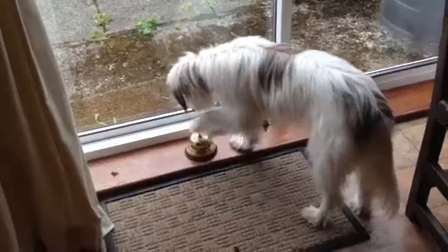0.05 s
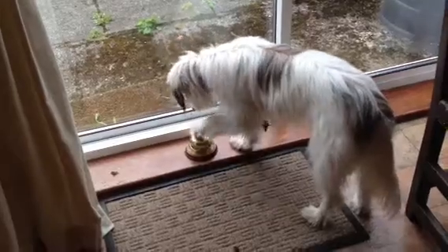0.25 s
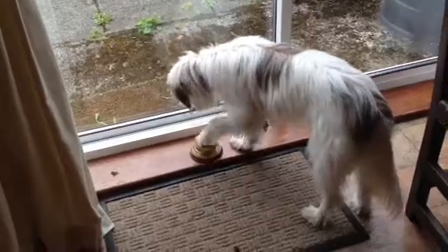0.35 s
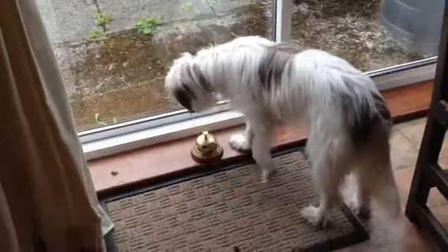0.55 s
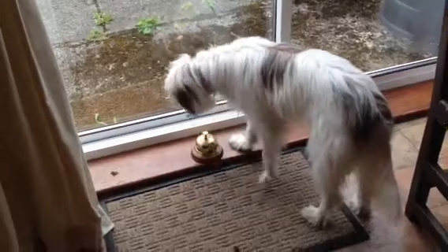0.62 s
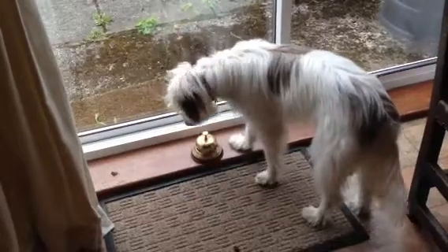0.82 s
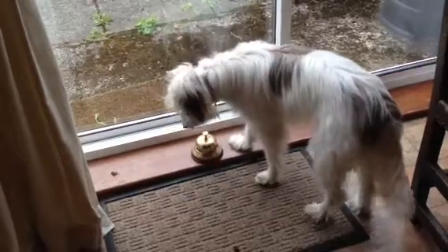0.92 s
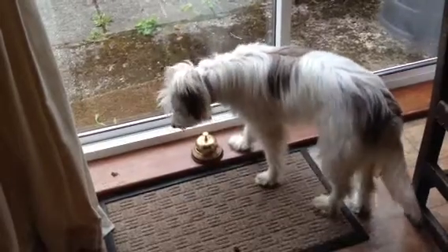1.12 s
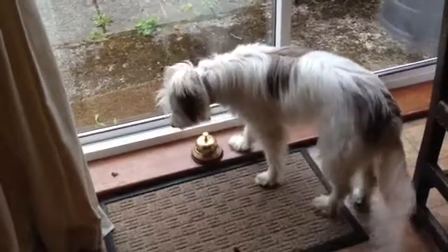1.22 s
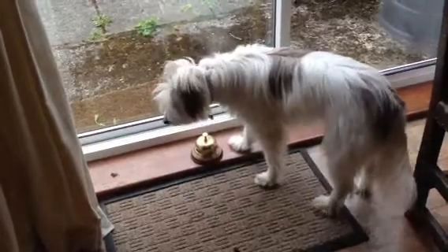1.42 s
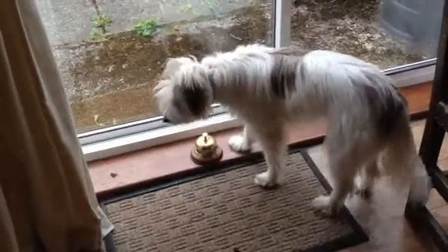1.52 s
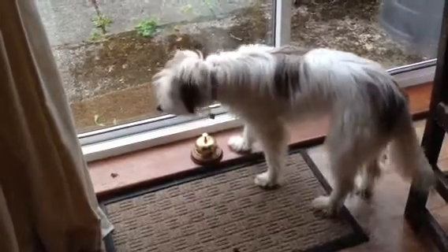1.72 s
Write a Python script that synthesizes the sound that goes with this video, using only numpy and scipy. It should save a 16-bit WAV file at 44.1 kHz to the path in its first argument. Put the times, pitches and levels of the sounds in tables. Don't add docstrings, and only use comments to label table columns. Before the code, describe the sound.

Bell ding, sharp and bright, recorded close indoors: a faint earlier ring and leg shuffle, tiny knocks, then the strike with a long wavering decay, light scuffs on a mat and small metallic ticks near the end.

```python
import sys
import numpy as np
from scipy import signal
from scipy.fft import rfft, irfft
from scipy.io import wavfile
from scipy.ndimage import uniform_filter1d

SR = 44100
rng = np.random.default_rng(int(sys.argv[2]) if len(sys.argv) > 2 else 0)


def ratio_of_db(decibels):
    return 10 ** (np.asarray(decibels, float) / 20)


def persist_wave(psi):
    counts = np.round(np.clip(psi, -1, 1) * 32767).astype(np.int16)
    wavfile.write(sys.argv[1], SR, np.atleast_2d(counts).T)


N = 77175
T = np.arange(N) / SR
STRIKE_S = .2325


def curve(rows, column=1):
    rows = np.array(rows)
    return np.interp(T, rows[:, 0], rows[:, column])


def noise(colour):
    points = np.array(colour)
    log_hz = np.log(np.fft.rfftfreq(N, 1 / SR) + 1)
    at = np.log(points[:, 0])
    outside = np.maximum(at[0] - log_hz, 0) + np.maximum(log_hz - at[-1], 0)
    db = np.interp(log_hz, at, points[:, 1]) - 40 * outside
    x = irfft(rfft(rng.standard_normal(N)) * ratio_of_db(db), N)
    return x / x.std()


def walk(rate):
    width = int(SR / rate)
    x = uniform_filter1d(uniform_filter1d(rng.standard_normal(N), width), width)
    return x / x.std()


def fade(start, t60):
    return (T >= start) * ratio_of_db(-60 * np.maximum(T - start, 0) / t60)


def ring(start, modes):
    return sum(ratio_of_db(db) * fade(start, t60) * np.sin(2 * np.pi * hz * (T - start)) for hz, db, t60 in modes)


def room(x):
    low = signal.sosfilt(signal.butter(1, 1500, fs=SR, output="sos"), rng.standard_normal(N))
    high = rng.standard_normal(N)
    tail = low * fade(.004, .68) + high * fade(.0079, .46) * .36
    return signal.fftconvolve(x, tail / np.sqrt(np.sum(tail ** 2)))[:N]


def hum():
    # f/Hz, level/dB
    tone_colour = [(40, -44.5), (90, -30.5), (200, -26), (900, -21), (2800, -27), (9500, -32.5),
                   (13500, -32.5), (15500, -35)]
    tone = noise(tone_colour) * ratio_of_db(2.4 * walk(7.5))
    bass = ratio_of_db(-10.5 + 2.5 * walk(5.2)) * noise([(150, 2), (330, 0), (600, -10.5)])
    return ratio_of_db(-69.5) * (tone + bass)


def earlier():
    # f/Hz, level/dB, T60/s
    late_modes = [(4942, -67, 0.18), (7395, -83, .3), (8050, -65, 0.33), (7729, -65.5, 0.61),
                  (7778, -55, .3), (11300, -68.5, .3), (13500, -66.5, 0.47), (14800, -67.5, .3)]
    # f/Hz, level/dB
    wash_colour = [(1760, -55), (3000, -35), (5640, -24.5), (7640, -4), (9650, -17), (10200, -9.5),
                   (11100, -25), (12900, -16), (15500, -21)]
    wash = ratio_of_db(-59) * fade(0, .4) * noise(wash_colour)
    return ring(0, late_modes) * ratio_of_db(2.5 * walk(30)) + wash


def leg():
    # t/s, thud level/dB, rub level above the thud/dB
    shuffle = [(0, -64, -29), (.06, -62, -18), (.1, -57, -21), (.19, -55.5, -15.5), (.245, -42.5, 4),
               (.34, -61.5, -1), (.49, -58, -6.5), (.56, -65, 0), (.68, -82.5, -11.5)]
    # f/Hz, level/dB
    thud_colour = [(110, -28), (145, -2.5), (225, 3), (280, -7), (420, -4), (650, -12), (900, -23)]
    # f/Hz, level/dB
    rub_colour = [(710, -47.5), (1200, -2), (2660, -9.5), (2890, 2.5), (3020, -7), (4500, -5.5),
                  (5850, -47), (9900, -120)]
    motion = ratio_of_db(curve(shuffle) - 310 * np.maximum(T - .68, 0))
    thud = ratio_of_db(2.5 * walk(40)) * noise(thud_colour)
    rub = ratio_of_db(curve(shuffle, column=2) + 1.6 * walk(60)) * noise(rub_colour)
    return motion * (thud + rub)


def paws():
    # t/s, length/s, level/dB, centre f/Hz
    scuffs = [(0.716, 0.072, -73, 12100), (0.726, 0.14, -70.5, 756), (.97, .05, -73, 13000),
              (0.984, .035, -73.5, 3450), (0.065, 0.14, -64, 1610), (0.378, 0.1, -57, 1400),
              (.47, 0.049, -59, 190), (1.24, 0.68, -76, 352), (1.241, 0.068, -65, 2207),
              (1.261, 0.017, -72, 10000), (1.355, 0.15, -67.5, 1660), (1.374, 0.068, -67.5, 13400),
              (1.471, 0.089, -73, 1560)]
    out = np.zeros(N)
    for start, length, db, hz in scuffs:
        swell = np.sin(np.pi * np.clip((T - start) / length, 0, 1) ** .55) ** 2
        band = noise([(hz / 1.88, -8), (hz, 0), (hz * 1.37, -8)])
        out += ratio_of_db(db + 1.9 * walk(270)) * swell * band
    return out


def tag():
    # t/s, level/dB, f/Hz
    ticks = [
        (1.076, -60, 4850),
        (1.362, -65, 6770),
        (1.457, -63.5, 6100),
        (1.486, -58, 5900),
        (1.515, -58, 5960),
    ]
    out = np.zeros(N)
    for start, db, hz in ticks:
        band = noise([(hz * .73, -30), (hz * .93, -3), (hz, -3), (hz * 1.84, -25)])
        out += ratio_of_db(db) * fade(start, .025) * band
    return out


def scrape():
    # t/s, level/dB
    drag = [(.188, -90), (.190, -57), (.197, -62), (.207, -59), (.214, -48), (.222, -49), (.232, -46),
            (.24, -60), (.26, -90)]
    # f/Hz, level/dB
    grit_colour = [(700, -29.5), (1400, -7.5), (2800, -17), (5500, -5), (7000, 5), (8600, -6), (10000, -22),
                   (15500, -26.5)]
    return ratio_of_db(curve(drag) + 2 * walk(600)) * noise(grit_colour)


def plunger():
    knock_times = [.1895, .209, .2203, .2243, .2325]
    # ring level/dB, crack level/dB
    knock_levels = [
        (-59.5, -56),
        (-55.5, -60),
        (-34.5, -32),
        (-40.5, -37.5),
        (-29, -20.5),
    ]
    # f/Hz, level/dB, T60/s
    base_modes = [(1650, -8, .04), (5911, -6, .11), (5860, -8, .1), (6623, -8, .1), (6900, 0, .02),
                  (7714, -3, .14), (7873, -9, .1), (8500, -8, .05)]
    # f/Hz, level/dB
    crack_colour = [(300, -29.5), (1200, -23.5), (1700, -18.5), (3000, -29.5), (6500, -17), (9200, -39),
                    (13500, -5), (15500, -27.5)]
    # f/Hz, level/dB, T60/s
    sill_modes = [(195, -56, 0.068), (264.2, -53.5, 0.085), (346, -43, 0.046), (444, -58.5, 0.02),
                  (1530, -40, 0.01)]
    crack = noise(crack_colour)
    out = ring(STRIKE_S, sill_modes)
    for start, (db, crack_db) in zip(knock_times, knock_levels):
        out = out + ratio_of_db(db) * ring(start, base_modes)
        out = out + ratio_of_db(crack_db) * fade(start, .025) * crack
    return out


def dome():
    # f/Hz, level/dB, T60/s
    dome_modes = [(1105.96, -49.4, 11.), (2833.16, -41.1, .93), (4937.62, -37.8, 1.9),
                  (7395.45, -21.8, .82), (10178.06, -26.3, .46), (13294.2, -37.7, .26), (2212.2, -68, 4.),
                  (10886, -37, .22), (12340, -42, .3), (14748, -29, .17), (14792, -38.5, .5),
                  (14820, -39, .28)]
    partners = {0: [(-1.18, -50.1, 6.8, .69)], 1: [(-13.48, -53., 2.2, .301), (-1.61, -41.9, 2.84, .387),
                (-1.12, -59, 6.19, .638), (-3.39, -42.5, 1.01, .502)], 2: [(6.47, -31.4, 1.43, .384),
                (7.14, -17.5, 1.22, .33), (11.94, -26.6, .42, .275)], 3: [(-2.44, -20.6, .68, .499),
                (4.18, -17.8, .52, .377), (1.64, -12.6, .46, .256), (-25., -42, .9, .29)],
                4: [(-4.22, -31.1, .43, .272), (3.65, -23.7, .41, .311), (16.83, -31.3, .4, .241)],
                5: [(13.5, -16.9, .16, .299)]}
    out = ring(STRIKE_S, dome_modes)
    for mode, rows in partners.items():
        for detune, db, t60, lull in rows:
            cycles = dome_modes[mode][0] * (T - STRIKE_S) + detune * (T - lull)
            out = out - ratio_of_db(db) * fade(STRIKE_S, t60) * np.sin(2 * np.pi * cycles)
    dip = 1 - .35 * np.exp(-np.abs(T - STRIKE_S) / .012)
    return out * ratio_of_db(.7) * dip


def thinned(x, bell):
    low_hz, high_hz, width_hz = 4000, 12000, 430.
    margin_db, follow, chance_db = -50.5, .6, 2.5
    up_db, down_db = 7, 40
    hz, _, z = signal.stft(x, SR, nperseg=1024)
    bell_z = signal.stft(bell, SR, nperseg=1024)[2]
    loud = 10 * np.log10(np.abs(bell_z) ** 2 + 1e-14)
    edges = np.arange(low_hz, high_hz, width_hz)
    luck = uniform_filter1d(rng.standard_normal((len(edges), z.shape[1])), size=5, axis=1) * 5 ** .5
    for low, chance in zip(edges, luck):
        band = (hz >= low) & (hz < low + width_hz)
        octaves = np.log2(low / (hz + 1))[:, None]
        spread = np.where(octaves > 0, up_db, -down_db) * octaves
        reach = np.max(follow * loud - spread, axis=0)
        power = uniform_filter1d(np.sum(np.abs(z[band]) ** 2, axis=0), size=3)
        own = 10 * np.log10(power + 1e-14)
        over = own - reach - margin_db - chance_db * chance
        z[band] *= ratio_of_db(np.clip(12 * over, -24, 0))
    return signal.istft(z, SR)[1][:N]


def scene():
    bell = dome()
    knocks = plunger() + scrape()
    wet = room(ratio_of_db(-32) * bell + ratio_of_db(-2.5) * knocks)
    body = signal.butter(8, 135, "high", fs=SR, output="sos")
    near = signal.sosfilt(body, knocks + wet + leg() + paws() + tag())
    return (bell + thinned(near + earlier() + hum(), bell))[None]


def top_cut(x):
    return signal.sosfilt(signal.butter(12, 15770, fs=SR, output="sos"), x)


def record(dry):
    x = signal.sosfilt(signal.butter(2, 90, "high", fs=SR, output="sos"), dry)
    x = signal.sosfilt(signal.ellip(8, .2, 60, 15500, fs=SR, output="sos"), x)
    return top_cut(x)


dry = scene()
out = record(dry)
persist_wave(out)
```